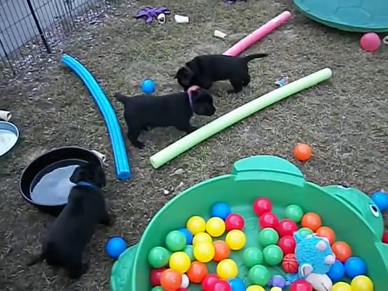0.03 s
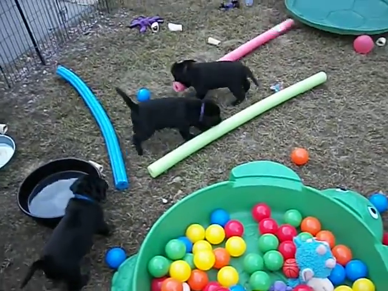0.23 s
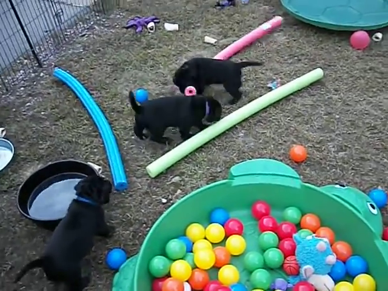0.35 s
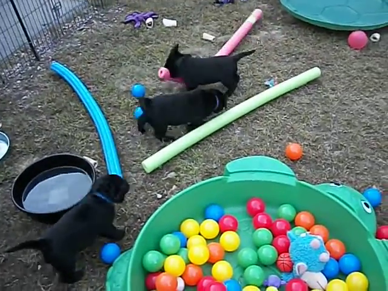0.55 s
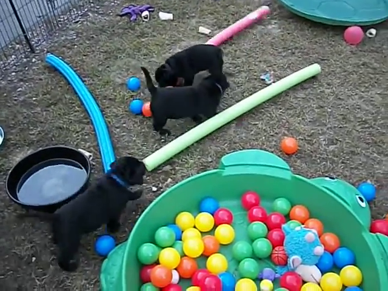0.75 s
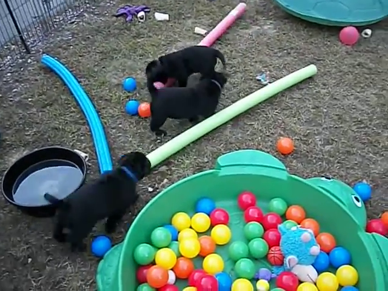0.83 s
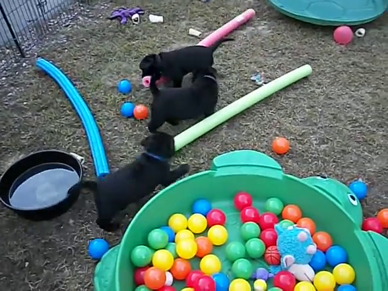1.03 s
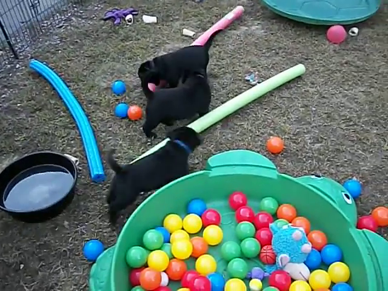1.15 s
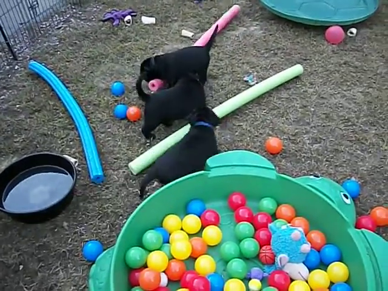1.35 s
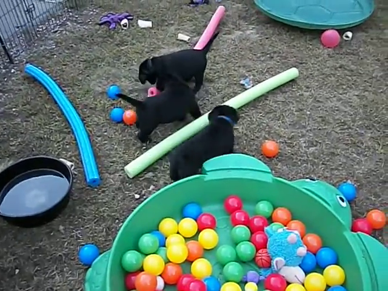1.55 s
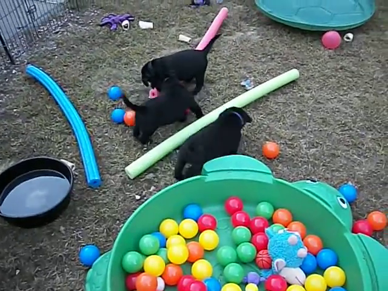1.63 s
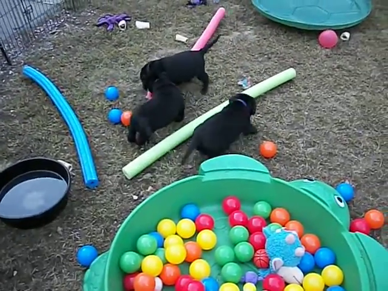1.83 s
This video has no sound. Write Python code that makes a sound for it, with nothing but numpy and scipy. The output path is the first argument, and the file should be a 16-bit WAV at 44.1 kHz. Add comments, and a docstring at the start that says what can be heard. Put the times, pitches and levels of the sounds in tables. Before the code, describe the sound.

Hollow plastic toys knock and tap on the ground over quiet outdoor hiss.

```python
"""Hollow plastic knocks and taps: puppies bump their toys about on bare ground in a quiet yard.
One toy scrapes, catches with a short squeak and lands with a sharp knock that rings its shell.
Light taps clatter and soft blows thud on the hollow toys while dry grass and grit crackle under them.
Behind it all sit a low outdoor hiss and the faint trill of an insect's wing strokes."""
import sys
import numpy as np
from scipy import signal
from scipy.fft import rfft, irfft
from scipy.io import wavfile
from scipy.ndimage import uniform_filter1d

SR = 44100
rng = np.random.default_rng(int(sys.argv[2]) if len(sys.argv) > 2 else 0)


def to_wav(s):
    """Save 16-bit WAV."""
    ch = np.atleast_2d(s).T  # columns
    pcm = np.round(np.clip(ch, -1, 1) * 32767)  # PCM
    wavfile.write(sys.argv[1], SR, pcm.astype(np.int16))


N = 83790


def amp(db):
    """Decibels to gain."""
    return 10 ** (np.asarray(db) / 20)


def unit(x):
    """Scales to rms 1."""
    return x / np.sqrt(np.mean(x ** 2) + 1e-20)


def fade(t, t60):
    """Exponential decay, 60 dB down at t60."""
    return np.exp(-np.log(1000) * t / t60)


def add(mix, start_s, sound):
    """Lays a sound into the mix at start_s."""
    part = mix[max(round(start_s * SR), 0):][:len(sound)]
    part += sound[:len(part)]


def coloured(x, points):
    """Shapes x with an EQ curve of (freq_hz, gain_db) points, at rms 1."""
    hz, db = np.transpose(points)
    freqs = np.fft.rfftfreq(len(x), 1 / SR)
    gain = amp(np.interp(np.log(freqs + 1), np.log(hz), db))
    return unit(irfft(rfft(x) * gain, len(x)))


def envelope(points):
    """Gain curve through (time_s, level_db) points, silent outside them."""
    times, db = np.transpose(points)
    t = np.arange(N) / SR
    inside = (t >= times[0]) & (t <= times[-1])
    return inside * amp(np.interp(t, times, db))


def low_pass(x, hz, size=255):
    """Steep low-pass."""
    return signal.oaconvolve(x, signal.firwin(size, hz, window="blackman", fs=SR)[None], "same")


def knock(attack_s=0.00053, push_rise_s=0.006):
    """The hollow toy lands: its modes ring and die quickly over a low push."""
    # modes of the toy: pitch_hz, level_db, t60_s
    modes = [(791, -4, 0.018), (1115, -4, 0.013), (1347, -18.5, 0.035), (769, -27, .06), (1057, -36, 0.081),
             (632, -37, 0.28)]
    t = np.arange(SR // 2) / SR
    ring = sum(amp(db) * fade(t, t60) * np.sin(2 * np.pi * hz * t) for hz, db, t60 in modes)
    push = amp(-29) * fade(t, t60=0.089) * (1 - np.exp(-t / push_rise_s))
    return (1 - np.exp(-t / attack_s)) * ring + push


def tap(body_db, shell_db, tick_db, tick_hz, chatter_s, size=4096):
    """A click, its chatter and a short scatter excite three broad, well damped resonances."""
    t = np.arange(size) / SR
    freqs = abs(np.fft.fftfreq(size, 1 / SR)) + 1
    # hollow body, shell and tick: relative_db, centre_hz, width_octaves
    resonances = (body_db, 215, 0.88), (shell_db, 906, 0.82), (tick_db, tick_hz, 0.53)
    steepness = 2.67
    power = sum(amp(db) ** 2 / (1 + (np.log2(freqs / hz) / width) ** 2) ** steepness
                for db, hz, width in resonances)
    # minimum phase keeps the attack sharp
    log_spectrum = np.conj(signal.hilbert(np.log(np.sqrt(power))))
    ring = np.fft.ifft(np.exp(log_spectrum)).real
    chatter = unit(rng.standard_normal(size) * t * np.exp(-2 * t / chatter_s))
    scatter = unit(rng.standard_normal(size) * fade(t, t60=0.084))
    force = (0.59 * chatter + 0.32 * scatter) / np.sqrt(size)
    force[0] += 1  # the click
    return signal.fftconvolve(force, ring)[:size]


def taps():
    """The toys clatter, one tap for each hard contact."""
    # hard contacts, levels relative: start_s, body_db, shell_db, tick_db, tick_hz, chatter_s
    contacts = [(0.1164, -4, -1.5, -6, 2500, 0.0054), (0.1408, -37, -29, -16, 5050, 0.0032),
                (0.1494, -40, -40, -14.5, 5400, 0.0035), (0.229, -26, -13, -14, 3560, 0.009),
                (0.238, -35, -16, -27, 3100, .004), (0.2507, -14, 9, 5, 2100, .0012),
                (0.2533, -45, 1.5, -10, 4000, 0.001), (0.386, -32.5, -33, -19, 4470, 0.0066),
                (0.4144, -7.5, -6, -3.5, 3890, .002), (0.4174, -33, -17, -10, 4600, 0.0054),
                (.4430, -26, -39, -17, 4300, .003), (0.4502, -16, -10.5, -7.5, 3530, 0.0042),
                (0.5906, -25, -29.5, -12, 3930, 0.0016), (.5968, -41, -44, -12.5, 4100, 0.0027),
                (0.6138, -7.5, -15.5, -10, 3540, 0.0055), (0.666, -26, -15.5, -19.5, 4180, 0.0046),
                (0.6953, -27, 3, -10, 4600, 0.0023), (.7030, -5, -9, -17.5, 4330, .004),
                (0.731, -34, -13, -34, 1340, 0.0059), (.7970, 0.5, -12, -27, 3000, 0.0043),
                (0.982, -19, -11.5, -13, 3980, 0.0016), (1.156, -7, -37, -31, 3000, 0.0068),
                (1.17, -36, -25, -44, 3000, 0.0054), (1.279, -36, -20, -23, 4140, 0.0023),
                (1.3822, -32, -18, -17.5, 3980, 0.0008), (1.447, -6, -31, -50, 3000, 0.0072),
                (1.5537, 9, 3, 2.5, 3400, 0.0021), (1.5667, -18, -21, -15, 4900, 0.0097),
                (1.589, -28, -9, -15, 2780, 0.012), (1.694, -7, -23, -56, 3000, .006),
                (1.7165, -39, -41, -29.5, 3900, .002), (1.82, -3, -25, -44, 3000, .003)]
    out = np.zeros(N)
    for start_s, *contact in contacts:
        add(out, start_s, tap(*contact))
    return amp(5.5) * out


def bumps(wall_hz=211.3, swell_power=3.04):
    """Soft blows on hollow toys swell and die in a dull thud; the plastic wall rings on faintly."""
    # soft blows: start_s, level_db, pitch_hz, peak_s, wall_db (relative to the blow)
    blows = [(.019, -39.5, 282, 0.0035, -18), (0.2488, -19, 153, 0.0023, -43),
             (.386, -37.5, 614, 0.0033, -29), (.4135, -34, 850, 0.00095, -43),
             (.450, -41.5, 175, 0.012, -20), (0.6936, -19.5, 257.5, 0.0046, -22),
             (.7965, -34.5, 204, 0.0035, -20), (1.158, -39.5, 273, 0.0036, -21),
             (1.166, -32, 237, 0.0023, -13), (1.19, -41.5, 280, 0.0056, -20.5),
             (1.216, -43, 245, 0.0092, -20), (1.441, -28.5, 226, 0.0061, -22),
             (1.555, -28.5, 118, 0.0042, -32), (1.5885, -35.5, 797, 0.0033, -37),
             (1.5887, -16, 231.7, 0.0064, -19.5), (1.607, -32, 221, 0.0039, -21),
             (1.665, -36.5, 229, 0.0036, -8), (1.693, -39, 645, 0.0051, -24), (1.755, -39, 218, .005, -20),
             (1.8225, -36.5, 626, 0.002, -48)]
    out, t = np.zeros(N), np.arange(SR // 2) / SR
    for start_s, db, hz, peak_s, wall_db in blows:
        swell = (t / peak_s * np.exp(1 - t / peak_s)) ** swell_power
        thud = swell * np.sin(2 * np.pi * hz * t)
        wall_level = amp(wall_db) * (1 - np.exp(-t / peak_s)) * fade(t, t60=0.22)
        wall = wall_level * np.sin(2 * np.pi * wall_hz * t)
        add(out, start_s, -amp(db) * (thud + wall))
    return out


def scrape():
    """Plastic slides harder and harder: a short, bright swell of friction noise."""
    # swell of the slide: time_s, level_db
    swell = [(.16, -87), (.2, -48), (.223, -33), (.235, -29), (.239, -18.5), (.2425, -20), (.2445, -23.5),
             (.249, -18.5), (.253, -30), (.259, -76)]
    # tone of the friction: freq_hz, gain_db
    colour = [(60, -22), (700, -9.5), (1800, -14), (2700, -6.5), (4200, -5.5), (4900, 0), (5250, 7.5),
              (5550, -8), (5900, 3.5), (6600, -10)]
    return envelope(swell) * coloured(rng.standard_normal(N), colour)


def squeak(length_s=0.0031, pitch_hz=5043, upper_hz=5900):
    """The sliding plastic catches in one shrill squeak with a weaker upper partial."""
    t = np.arange(0, length_s, 1 / SR)
    tone = np.sin(2 * np.pi * pitch_hz * t) + amp(-13.5) * np.sin(2 * np.pi * upper_hz * t)
    return amp(-2) * np.sin(np.pi * t / length_s) ** 2 * tone


def rustle(grains_per_s=4600, spread_db=4):
    """Dry grass and grit give way under the toys in tiny crackles."""
    # stirring of the ground: time_s, level_db
    stir = [(0, -56.5), (.13, -52), (.2, -47), (.27, -45), (.33, -51), (.365, -50), (.4, -53.5), (.43, -42),
            (.458, -43), (.48, -54.5), (.57, -58), (.67, -44), (.73, -51.5), (.8, -50), (.95, -57.5),
            (1.2, -65), (1.9, -69.5)]
    # tone of the crackle: freq_hz, gain_db
    colour = [(100, -20), (700, 0.5), (1700, -9.5), (3000, -5), (4700, -5), (5800, -7.5), (6600, -18.5)]
    sizes = amp(spread_db * np.minimum(rng.exponential(1, N), 4)) * rng.choice([-1, 1], N)
    grains = sizes * (rng.random(N) < grains_per_s / SR)
    return envelope(stir) * coloured(grains, colour)


def insect(strokes_per_s=57.3, pitch_hz=5118, fall_hz_per_s=74000, level_db=-53.5):
    """A distant insect trills: one falling chirp for each wing stroke, a little uneven."""
    chirp_s, rise_s = 0.014, 0.0072
    jitter_s, spread_db, spread_hz = 0.0021, 1.3, 55
    out, t = np.zeros(N), np.arange(0, chirp_s, 1 / SR)
    shape = (t / rise_s * np.exp(1 - t / rise_s)) ** 2 * (1 - (t / chirp_s) ** 2)
    for start_s in np.arange(0, N / SR, 1 / strokes_per_s):
        late, loud, high = rng.standard_normal(3)
        hz = pitch_hz + spread_hz * high - fall_hz_per_s * t
        chirp = shape * np.sin(2 * np.pi * np.cumsum(hz) / SR)
        add(out, start_s + jitter_s * late, amp(level_db + spread_db * loud) * chirp)
    return out


def air(level_db=-48.5, drift_db=1.13):
    """A bed of quiet outdoor hiss whose level drifts a little."""
    # tone of the yard: freq_hz, gain_db
    colour = [(20, -10.5), (35, 5), (70, 0), (110, 5), (190, -0.5), (310, -2), (430, -10.5), (610, -0.5),
              (820, -4), (1050, -10.5), (1650, -15.5), (2150, -18), (2460, -11), (3300, -20), (4100, -13.5),
              (4730, -16), (5700, -21.5), (6550, -27)]
    drift = unit(uniform_filter1d(rng.standard_normal(N), size=4000))
    return amp(level_db + drift_db * drift) * coloured(rng.standard_normal(N), colour)


def scene():
    """The toys over the yard's ambience, heard in the open from one spot."""
    out = air() + rustle() + scrape() + bumps() + taps() + insect()
    add(out, start_s=0.2493, sound=squeak())
    add(out, start_s=0.2544, sound=knock())
    return out[None]


def record(dry):
    """A narrow-band finish: the treble is cut away and any peak over full scale clips."""
    softened = low_pass(dry, hz=6150, size=101)
    narrow = low_pass(softened, hz=6650)
    return low_pass(np.clip(narrow, -1, 1), hz=16000)


dry = scene()
out = record(dry)
to_wav(out)
```